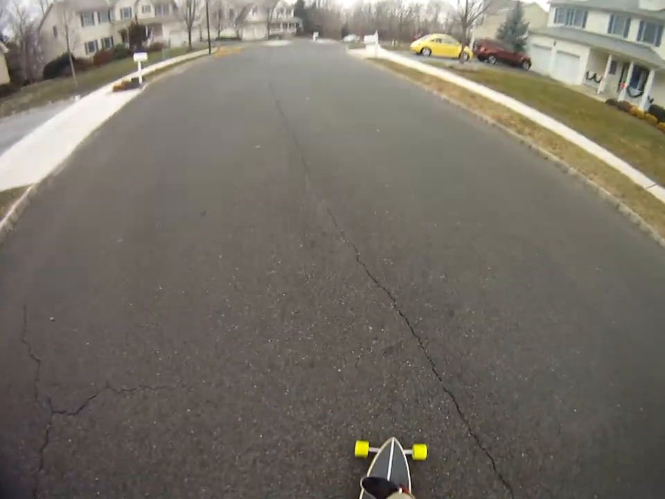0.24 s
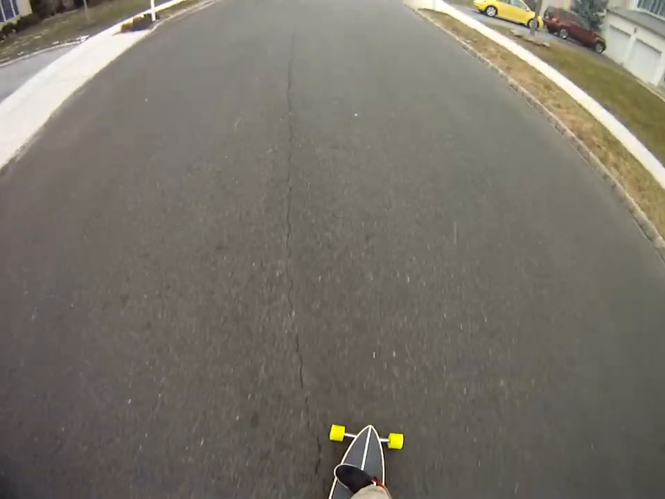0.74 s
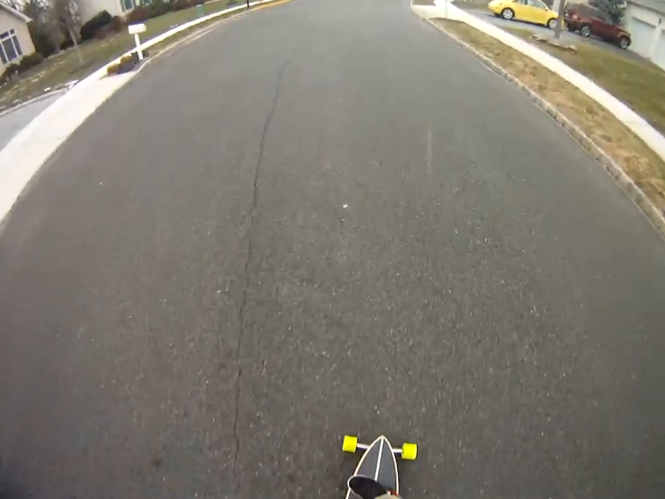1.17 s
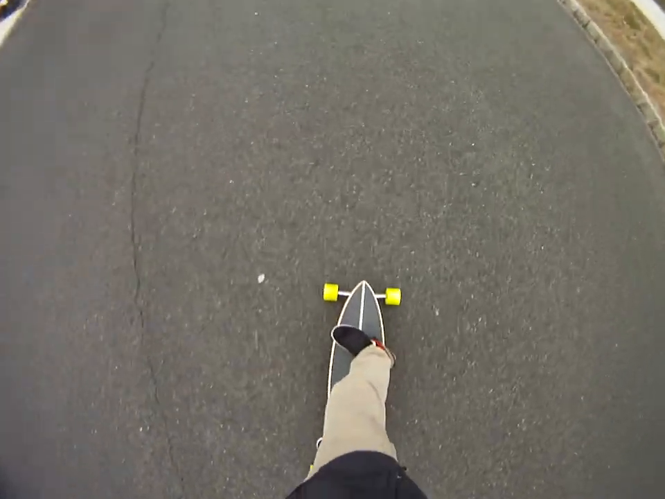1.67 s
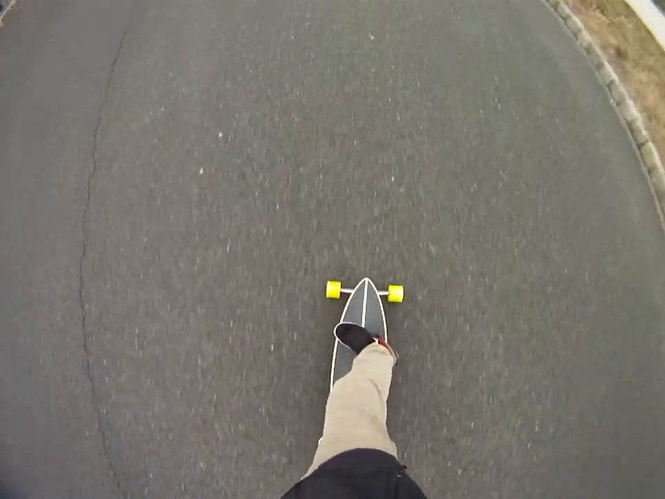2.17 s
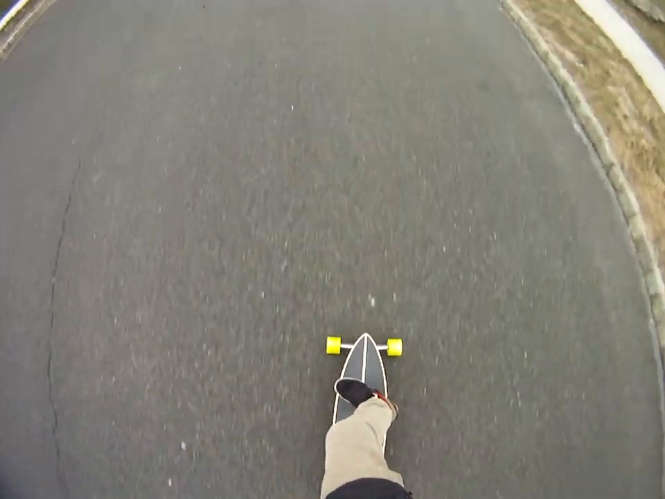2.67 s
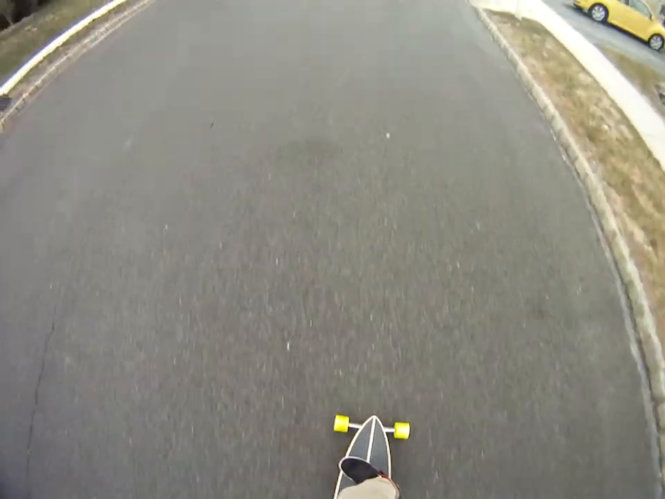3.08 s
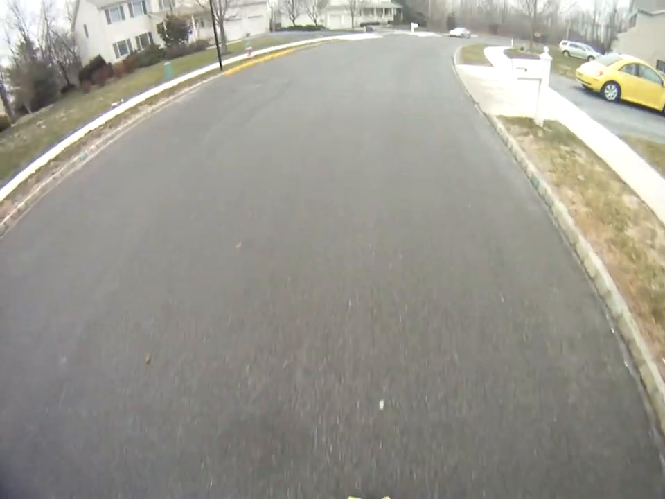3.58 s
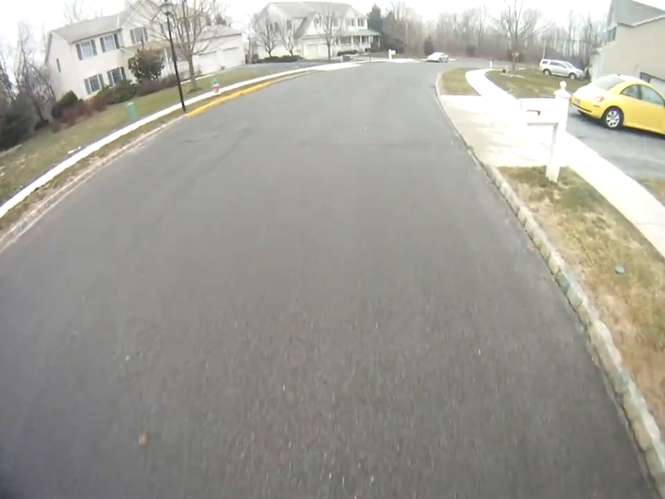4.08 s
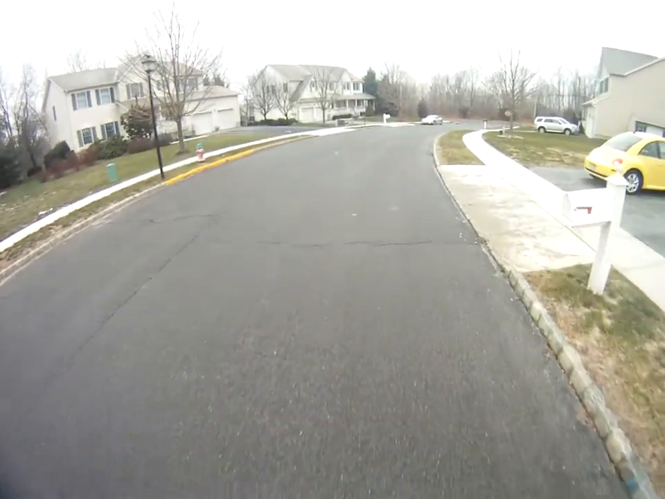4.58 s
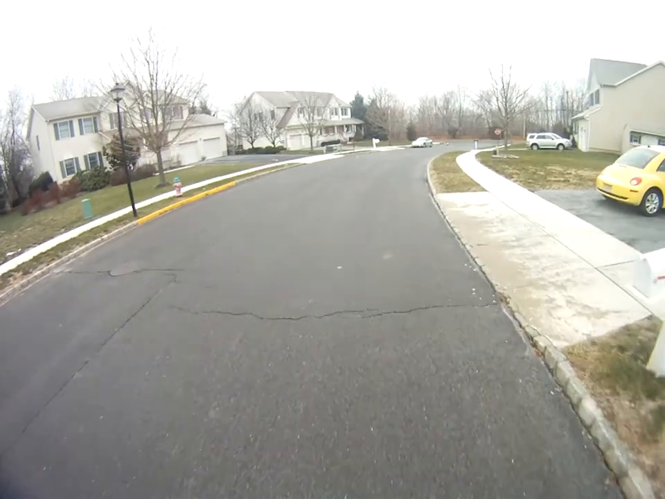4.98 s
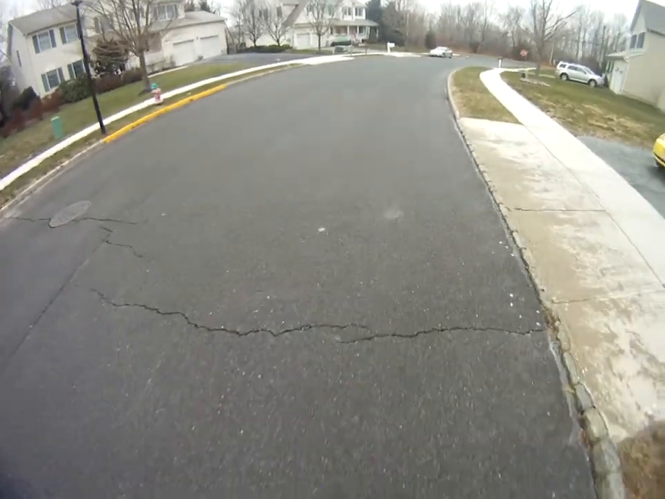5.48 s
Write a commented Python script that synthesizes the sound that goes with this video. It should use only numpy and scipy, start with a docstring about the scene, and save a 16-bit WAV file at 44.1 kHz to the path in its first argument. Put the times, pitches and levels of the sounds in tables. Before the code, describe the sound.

A longboard coasts along an open suburban asphalt street, heard from a camera on the rider. Deep wind rumble dominates, flapping early, thumping around one and a half seconds, easing, then hitting hardest near the end. Underneath are quiet wheel drumming, thin tread hiss, brief coarse rasps and tiny grit clicks.

```python
"""On an asphalt street a longboard coasts downhill, heard from a camera worn by the rider.
Wind is a noise pattern carried past the microphone, with gusts and single hard eddies.
Random stone contacts ring the deck and wheels; coarse patches rasp, grit snaps and bumps thud.
The camera samples slowly and holds each sample, which mirrors the wind into a thin sizzle high up."""
import sys
import numpy as np
from scipy import signal
from scipy.fft import rfft, irfft, next_fast_len
from scipy.io import wavfile
from scipy.ndimage import uniform_filter1d, map_coordinates

SR = 44100
rng = np.random.default_rng(int(sys.argv[2]) if len(sys.argv) > 2 else 0)


def wav_out(sig):
    """Save sig, one row per channel (or a flat mono array), as 16-bit PCM at SR to the path in sys.argv[1]."""
    wavfile.write(sys.argv[1], SR, np.round(np.clip(np.atleast_2d(sig).T, -1, 1) * 32767).astype(np.int16))


N = 253134
TIME = np.arange(N) / SR   # seconds

# Air flow past the microphone. Each row: time in seconds, speed relative to the usual.
AIR_SPEED = [(0, 1.007), (2.9, .99), (3.6, 0.82), (4.4, 0.85), (4.7, 1.21), (4.9, 1.247), (5.09, 1.62),
             (5.33, 1.16), (5.6, 0.98)]
# Gusts on the microphone. Each row: start in seconds, hold in seconds, level in dB before wind() lifts it.
GUST_ROWS = [(0.106, 0.029, -27), (0.177, 0.15, -28), (0.842, 0.16, -35.5), (1.18, 0.056, -34),
             (1.278, 0.088, -26.5), (1.404, 0.12, -23), (1.588, 0.4, -36), (2.327, .03, -25.5),
             (2.42, 0.23, -39), (3.572, 0.048, -32.5), (4.319, 0.15, -27), (4.46, 0.19, -22.5),
             (4.769, 0.13, -21), (4.965, .14, -26), (5.261, 0.077, -28), (5.51, 0.24, -37),
             (5.596, .025, -23)]
# Single hard eddies. Each row: time in seconds, level in dB before buffeted() lifts it, pitch in Hz.
HARD_EDDIES = [(0.102, -15, 109), (0.289, -18, 70), (0.225, -20, 208), (1.299, -14, 200), (1.354, -15, 184),
               (1.469, -19, 215), (2.346, -18, 61.5), (4.775, -10.5, 131), (4.872, -10.5, 160),
               (5.606, -11.5, 106)]
# Spectrum of the wind pattern at its usual speed. Each row: frequency in Hz, relative level in dB per Hz.
WIND_SPECTRUM = [(12, -27), (25, 0), (40, -1.5), (65, 3), (100, 0), (140, 1), (200, -5), (250, -8.5),
                 (320, -19), (400, -25), (520, -36.5), (800, -60.5)]
# Shaking of the deck as the road gets rougher or smoother. Each row: time in seconds, level in dB.
DECK_SHAKE = [(0.03, -46.5), (0.5, -46.5), (1.1, -52), (1.95, -46.5), (2.53, -48), (3.04, -58.5),
              (3.2, -49), (3.45, -50), (3.6, -55.5), (3.85, -50), (4.25, -51.5), (5.7, -49.5)]
# Bumps that jolt the deck. Each row: start in seconds, peak in dB, decay of the jolt in seconds.
DECK_BUMPS = [(3.121, -34, 0.0072), (4.073, -39, 0.0096)]
# Resonances of the deck. Each row: frequency in Hz, width in Hz, relative level in dB.
DECK_MODES = [(128, 83, -8), (260, 70, 0), (366.5, 92, 5), (487, 69, 1.5), (567, 54.5, -4)]
# Grit snapping under a wheel. Each row: start in seconds, snap peak in dB, pitch in Hz,
# dull knock in dB relative to the snap.
GRIT_SNAPS = [(0.069, -45.5, 3480, -15), (0.366, -44, 2750, 5), (0.6551, -48.5, 2380, -16),
              (1.126, -52.5, 2810, 8), (1.549, -52, 5000, -14), (3.1156, -43, 2620, -31),
              (4, -45, 2970, -4), (4.007, -47, 2430, -12), (4.049, -47.5, 2150, -12),
              (4.1053, -46, 3770, 4), (4.2056, -51, 3700, -3), (4.4697, -49.5, 5000, -12),
              (4.9353, -49, 3620, 5), (4.998, -51, 4000, -10), (5.0378, -42.5, 2350, -17),
              (5.1247, -42.5, 2900, 7)]
# Coarse patches under a wheel. Each row: start in seconds, level in dB before patches() lowers it, pitch in Hz.
COARSE_PATCHES = [(0.768, -46.5, 1730), (0.831, -43, 980), (0.872, -40, 1560), (0.925, -40.5, 1590),
                  (1.021, -43.5, 1750), (1.461, -46, 1670), (1.488, -44, 1650), (1.54, -47, 1650),
                  (1.571, -40.5, 1530), (1.689, -48, 1700), (1.748, -40.5, 1660), (2.963, -49, 1190),
                  (3.024, -44.5, 1590), (3.064, -42, 1680), (3.106, -42.5, 1080), (3.38, -48.5, 1300),
                  (3.424, -44, 1450), (3.46, -48.5, 1400), (3.492, -45.5, 1350), (3.529, -45.5, 1370),
                  (3.664, -50, 1410), (5.084, -48, 1430)]
# Wheels on the road. Each row: time in seconds, rolling level in dB before wheels() lowers it.
ROLLING = [(0.0, -57), (0.78, -59.5), (0.96, -57.5), (1.65, -57), (1.87, -61.5), (3.04, -60), (4.52, -63.5),
           (5.0, -59), (5.24, -63), (5.74, -58.5)]
# Spectrum of the tread hiss. Each row: frequency in Hz, relative level in dB per Hz.
HISS_SPECTRUM = [(500, 3), (750, 5.5), (1000, -9), (2300, 4.5), (2650, -5), (3000, -2), (3400, -2),
                 (3650, -1.5), (4000, -5.5), (5000, -6), (6000, -8.5)]
# Resonances of wheels and trucks. Each row: frequency in Hz, width in Hz, relative level in dB.
WHEEL_MODES = [(906.5, 48, 3), (1144, 54, 0), (1400, 160, -3), (1507, 106, -1.5), (1722, 114, -4),
               (2011, 73, -3.5), (2280, 113, -7)]

BREEZE_DB = -35   # the steady wind of the ride, before wind() lifts it
GUST_ATTACK_SHARE, GUST_RELEASE_SHARE = 0.56, 0.4   # of the hold: a long gust builds and dies slowly
PATCH_S = 0.026   # time a wheel takes to cross a coarse patch
SAMPLER_HZ, SAMPLER_EDGE_HZ, CUTOFF_HZ = 12000, 5750, 15200


def from_db(db):
    """Turn decibels into gain."""
    return 10 ** (np.asarray(db) / 20)


def rms_one(x):
    """Scale to unit power."""
    return x / np.sqrt(np.mean(x ** 2) + 1e-20)


def peak_one(x):
    """Scale to unit height."""
    return x / np.abs(x).max()


def evened(x, span_s):
    """Hold the power near one over every stretch of span_s."""
    span = max(int(span_s * SR), 64)
    return x / np.sqrt(uniform_filter1d(x ** 2, span) + 1e-12)


def in_time(rows):
    """Draw each column of a table as a curve over time."""
    seconds, *columns = np.transpose(rows)
    return [np.interp(TIME, seconds, column) for column in columns]


def band(x, low_hz, high_hz, order=2):
    """Keep only the sound between two frequencies."""
    return signal.sosfilt(signal.butter(order, [low_hz, high_hz], "band", fs=SR, output="sos"), x + 1e-18)


def drift(rate_hz):
    """Wander slowly at random around zero, with spread one."""
    step = 40   # samples between two random values
    r = np.exp(-2 * np.pi * rate_hz * step / SR)
    noise = rng.standard_normal(N // step + 2002)
    slow = signal.lfilter([1], [1, -2 * r, r * r], noise)[2000:]   # skip the start of the filter
    return np.interp(np.arange(N) / step, np.arange(len(slow)), rms_one(slow))


def coloured(x, spectrum):
    """Give a steady sound a smooth spectrum that falls away beyond its ends."""
    hz, db = np.transpose(spectrum)
    size = next_fast_len(N)
    log_hz = np.log(np.fft.rfftfreq(size, 1 / SR) + 1)
    beyond = np.abs(log_hz - np.clip(log_hz, np.log(hz[0]), np.log(hz[-1])))
    gain = from_db(np.interp(log_hz, np.log(hz), db) - 30 * beyond)
    return rms_one(irfft(rfft(x, size) * gain, size)[:N])


def resonance(x, hz, width_hz):
    """Ring at one frequency, with gain about one there; a narrow width rings longer."""
    r = np.exp(-np.pi * width_hz / SR)
    ringing = signal.lfilter([1, 0, -1], [1, -2 * r * np.cos(2 * np.pi * hz / SR), r * r], x + 1e-18)
    return (1 - r * r) / 2 * ringing


def body(x, modes):
    """Let an object ring at all its resonances side by side, with alternating signs."""
    out = 0
    for k, (hz, width_hz, db) in enumerate(modes):
        out = out + (-1) ** k * from_db(db) * resonance(x, hz, width_hz)
    return out


def grains(per_s, spread_db):
    """Random contacts with the stones in the asphalt, a few much harder than the rest."""
    hardness_db = spread_db * np.minimum(rng.exponential(1, N), 5)
    sizes = from_db(hardness_db) * rng.choice([-1, 1], N)
    return sizes * (rng.random(N) < per_s / SR)


def add(out, s, sound):
    """Mix a short sound in at time s."""
    start = int(np.clip(s * SR, 0, N - 1))
    out[start:start + len(sound)] += sound[:N - start]


def gust(start, hold, db):
    """Pressure of one gust: it builds, holds and dies away."""
    early = np.maximum(start - TIME, 0) / (GUST_ATTACK_SHARE * hold)
    late = np.maximum(TIME - start - hold, 0) / (GUST_RELEASE_SHARE * hold)
    return from_db(db) * np.exp(-early - late)


def wind_level(flutter_db=1.75):
    """Gusts add their power to the breeze, and the whole flutters; in dB."""
    power = from_db(BREEZE_DB) ** 2 + sum(gust(*row) ** 2 for row in GUST_ROWS)
    return 10 * np.log10(power) + flutter_db * drift(rate_hz=15.5)


def wind():
    """A frozen pattern of eddies is carried past the microphone: faster air moves its whole spectrum up."""
    level_db = wind_level()
    speed, = in_time(AIR_SPEED)
    uneven_noise = rng.standard_normal(N) * from_db(1.43 * drift(rate_hz=38.6))
    pattern = coloured(uneven_noise, WIND_SPECTRUM)
    # adding up the speed gives the place in the pattern that is at the microphone now
    passing = map_coordinates(pattern, [np.cumsum(speed)], order=3, mode="mirror")
    slow = signal.sosfiltfilt(signal.butter(1, 85, fs=SR, output="sos"), passing)
    slow_gain = from_db(-0.5 * (level_db - level_db.mean()))   # the slowest eddies swell least in a gust
    balanced = passing - slow + slow_gain * slow
    return from_db(level_db + 1.08) * evened(balanced, span_s=0.065)


def buffeted(air, cycles=0.42, lift_db=1):
    """A hard eddy sweeps the others aside and swings the pressure up and down once."""
    for s, db, hz in HARD_EDDIES:
        turns = (TIME - s) * hz
        swell = np.exp(-0.5 * (turns / cycles) ** 2)
        swing = from_db(db + lift_db) * swell * np.sin(2 * np.pi * turns)
        air = air * (1 - swell) - swing
    return air


def deck():
    """The deck rumbles with the unevenness of the road and thuds on bumps, through the same resonances."""
    level_db, = in_time(DECK_SHAKE)
    rumble = band(body(grains(per_s=4000, spread_db=3.26), DECK_MODES), 62, 733, order=3)
    out = from_db(level_db) * evened(rumble, span_s=0.04)
    t = TIME[:SR // 10]
    for s, db, decay_s in DECK_BUMPS:
        jolt = rng.standard_normal(len(t)) * np.exp(-t / decay_s)
        thud = band(body(jolt, DECK_MODES), 250, 620, order=3)
        add(out, s, from_db(db) * peak_one(thud))
    return out


def grit(crush_s=0.0028, tail_s=0.0089, tail_db=-22, ring_db=2):
    """A grain is crushed in a few milliseconds: a bright snap with a pitch of its own over a duller knock."""
    out, t = np.zeros(N), TIME[:SR // 20]
    crush = t / crush_s * np.exp(1 - 2 * t / crush_s)   # strongest at half of crush_s
    fade = crush + from_db(tail_db) * np.exp(-t / tail_s)
    for s, db, hz, knock_db in GRIT_SNAPS:
        cracks = fade * rng.choice([-1, 1], len(t))
        snap = band(cracks, 0.63 * hz, 1.84 * hz, order=3)
        snap = snap + from_db(ring_db) * resonance(snap, hz, width_hz=350)
        knock = band(cracks, 1100, 2400)
        add(out, s, from_db(db) * (peak_one(snap) + from_db(knock_db) * peak_one(knock)))
    return out


def drumming(per_s, spread_db):
    """Road grain sets wheels and trucks ringing; unit power."""
    ringing = body(grains(per_s, spread_db), WHEEL_MODES)
    return evened(band(ringing, 700, 2510, order=4), span_s=0.014)


def patches(level_db=-10, broad_db=-8, attack_s=0.0006, rim_hz=3640, rim_db=-16):
    """Each coarse patch starts abruptly and favours the resonances near its own pitch; a higher ring joins faintly."""
    out, ring = np.zeros(N), drumming(per_s=3000, spread_db=4.0)
    rim = rms_one(resonance(grains(per_s=3300, spread_db=1.5), rim_hz, width_hz=350))
    t = TIME[:int(2 * PATCH_S * SR)]
    shape = (1 - np.exp(-t / attack_s)) * np.exp(-(t / PATCH_S) ** 4)
    for s, db, hz in COARSE_PATCHES:
        start = int(s * SR)
        piece = ring[start:][:len(t)]
        rasp = rms_one(resonance(piece, hz, hz / 3) + from_db(broad_db) * piece)
        rasp = rasp + from_db(rim_db) * rim[start:][:len(t)]
        add(out, s, from_db(db + level_db) * rasp * shape)
    return out


def wheels():
    """The wheels drum steadily on the road, and the tread hisses as it peels off."""
    roll_db, = in_time(ROLLING)
    texture = drift(rate_hz=37)
    ring = drumming(per_s=6000, spread_db=2.5)
    hiss = evened(coloured(grains(per_s=12000, spread_db=2.5), HISS_SPECTRUM), span_s=0.16)
    ring_db = roll_db - 1.5 + 2.4 * texture
    # the hiss grows far less than the drumming
    hiss_db = -64.5 + 0.19 * (roll_db - roll_db.mean()) + 0.32 * texture
    return from_db(ring_db) * ring + from_db(hiss_db) * hiss


def scene():
    """Wind at the microphone, the board below it; soft ends."""
    ends = signal.windows.tukey(N, 0.002)
    board = deck() + grit() + patches() + wheels()
    return (ends * (buffeted(wind()) + board))[None]


def record(dry):
    """Each slow sample is held four times over, which mirrors the sound around the sampling rate; the top is cut."""
    smooth = signal.sosfilt(signal.butter(14, SAMPLER_EDGE_HZ, fs=SR, output="sos"), dry)
    slow_samples = signal.resample_poly(smooth, SAMPLER_HZ, SR, axis=1, padtype="edge")
    held = np.repeat(slow_samples, 4, axis=1)
    out = signal.resample_poly(held, SR, 4 * SAMPLER_HZ, axis=1, padtype="edge")[:, :N]
    return signal.sosfilt(signal.ellip(10, 0.2, 80, CUTOFF_HZ, fs=SR, output="sos"), out)


dry = scene()
out = record(dry)
wav_out(out)
```